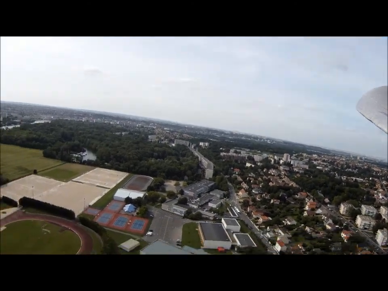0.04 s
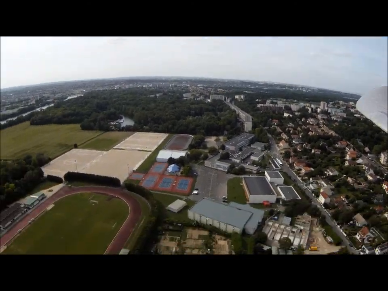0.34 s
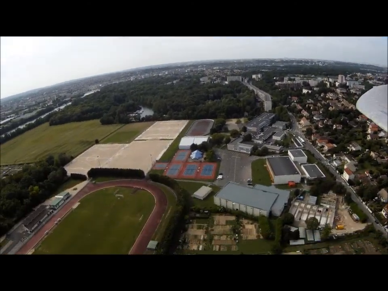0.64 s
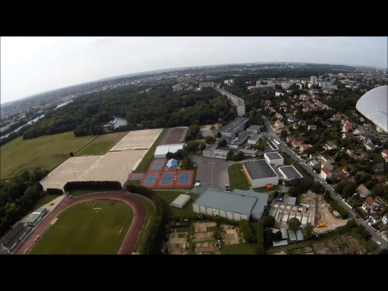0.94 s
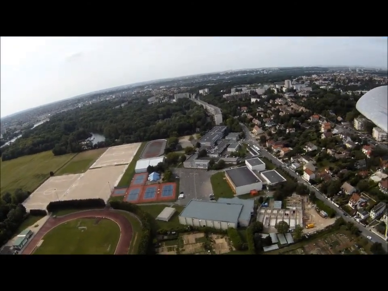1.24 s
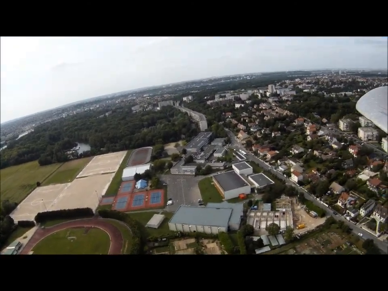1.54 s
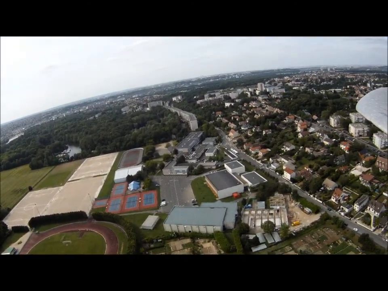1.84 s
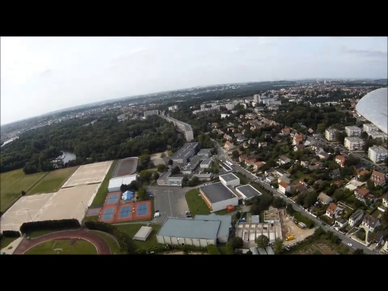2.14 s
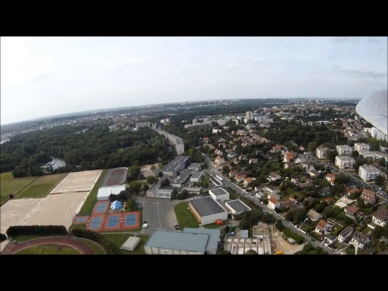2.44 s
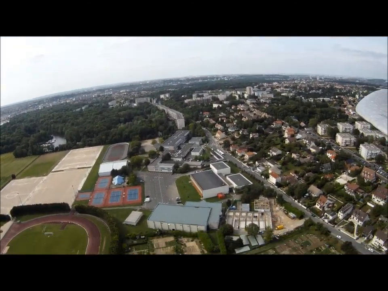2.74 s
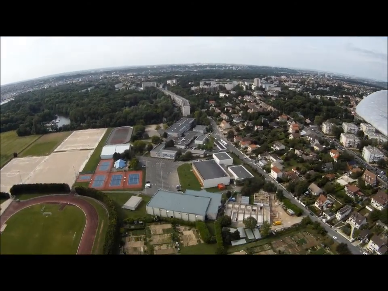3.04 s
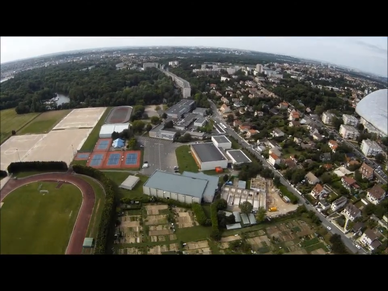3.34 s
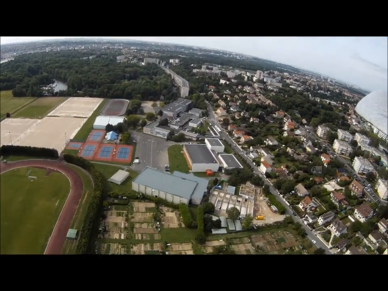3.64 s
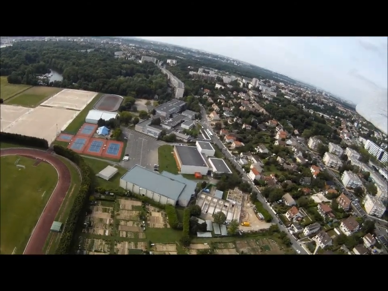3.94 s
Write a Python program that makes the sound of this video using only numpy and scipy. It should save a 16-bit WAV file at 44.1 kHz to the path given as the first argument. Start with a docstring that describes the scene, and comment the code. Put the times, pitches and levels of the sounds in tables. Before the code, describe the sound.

Wind rushes continuously over a small gliding model plane, hollow and hissing, swelling slightly in gusts. The onboard microphone also catches a low rumble and faint, irregular rattling ticks on the left.

```python
"""On board a small gliding model plane, heard from a camera as the air rushes past.
The airflow excites a hollow resonance near 750 Hz that rises with airspeed and widens in gusts,
over the broadband hiss of turbulence. Two low airframe resonances sink and fade as the flight
goes on. The left microphone also gets buffeting, a low hum, a fine crackle and the small dry
impacts of something loose."""
import sys
import numpy as np
from scipy import signal
from scipy.fft import rfft, irfft
from scipy.io import wavfile
from scipy.ndimage import uniform_filter1d

SR = 44100
rng = np.random.default_rng(int(sys.argv[2]) if len(sys.argv) > 2 else 0)


def master_out(mix):
    """Clip the mix to full scale and print it as 16-bit PCM to the path in sys.argv[1]."""
    frames = np.transpose(np.atleast_2d(mix))
    ceiling = np.clip(frames, -1, 1)
    pcm = np.round(ceiling * 32767).astype(np.int16)
    wavfile.write(sys.argv[1], SR, pcm)


N = 176400
FRAME, HOP = 1024, 256
TIME, FREQ_HZ = np.arange(N) / SR, np.fft.rfftfreq(N, 1 / SR)
FRAME_TIME, BIN_HZ = np.arange(N // HOP + 5) * HOP / SR, np.fft.rfftfreq(FRAME, 1 / SR)


def amp(db):
    """Amplitude ratio of a level in decibels."""
    return 10 ** (np.asarray(db) / 20)


def unit(x):
    """Normalisation to rms 1."""
    return x / np.sqrt(np.mean(x ** 2) + 1e-20)


def spectrum(points, hz):
    """Interpolation of a table on a logarithmic frequency axis."""
    f, value = np.transpose(points)
    return np.interp(np.log(hz + 1), np.log(f + 1), value)


def curves(rows, t):
    """Linear interpolation in time, one curve for each column after the first."""
    times, *columns = np.transpose(rows)
    return [np.interp(t, times, column) for column in columns]


def colour(x, points):
    """Zero-phase filtering by a spectrum table."""
    return irfft(rfft(x) * amp(spectrum(points, FREQ_HZ)), N)


def wander(rate_hz):
    """Random fluctuation: low-pass Gaussian noise of rms 1."""
    return unit(irfft(rfft(rng.standard_normal(N)) * np.exp(-(FREQ_HZ / rate_hz) ** 2), N))


def turbulence(shape_db, patchy_db):
    """Turbulent noise: short-lived eddies modulate a mean spectrum in time and frequency."""
    real, imag, eddies = rng.standard_normal((3, len(FRAME_TIME), len(BIN_HZ)))
    eddies = uniform_filter1d(eddies, size=8, axis=0)
    eddies = unit(uniform_filter1d(eddies, size=10, axis=1))
    frames = (real + 1j * imag) * amp(shape_db + patchy_db * eddies)
    return unit(signal.istft(frames.T, nperseg=FRAME, noverlap=FRAME - HOP)[1][:N])


def steadied(x):
    """Division by the running rms over 0.1 s evens out slow swells and leaves the fast flutter."""
    return x / np.sqrt(uniform_filter1d(x ** 2, size=SR // 10) + 1e-12)


def blown(hz, width_hz):
    """Random excitation of a resonance by airflow gives a narrow noise band about its frequency."""
    band = wander(width_hz * 0.95) + 1j * wander(width_hz * 0.83)
    phase = 2 * np.pi * np.cumsum(hz * np.ones(N)) / SR
    return steadied((band * np.exp(1j * phase)).real)


def on_left(x, right_db):
    """A level difference between the microphones places a source on the left."""
    return np.array([x, amp(right_db) * x])


# Course of the airflow: t/s, resonance f/Hz, relative resonance level/dB, relative hiss level/dB
AIRFLOW = [(0.0, 675, -45, -60.5), (0.14, 680, -46, -60), (0.22, 664, -43, -60), (0.53, 660, -44.5, -59.5),
           (1.44, 763.4, -37.5, -53.5), (1.63, 754, -40, -56.5), (1.94, 724, -40, -55.5),
           (2.05, 742, -42, -55.5), (2.19, 688, -42.5, -56), (2.38, 761, -36.5, -54),
           (2.46, 720, -40.5, -56), (2.78, 803, -37, -54.5), (2.96, 752, -39, -56), (2.97, 738, -41, -56),
           (3.42, 759, -38, -56), (3.52, 799, -40, -57), (3.76, 747, -40.5, -59), (3.96, 756, -42, -57.5)]
# Response of the hollow resonance at cruise: f/Hz, relative level/dB
HOLLOW_RESPONSE = [(300, -46.5), (480, -23.5), (570, -17), (650, -4), (730, 2.5), (800, -.5), (890, -6),
                   (1000, -14), (1150, -24.5), (1600, -52.5)]
# Bandwidth of the resonance: t/s, width factor below the centre, width factor above it
HOLLOW_WIDTH = [(0, 1.48, 1.02), (1.3, 1.32, 1.06), (2.3, 0.89, 1.05), (3.3, 0.83, 0.77), (4, 1.06, 0.86)]
# Gusts that add an upper shoulder to the resonance: t/s, 1/e half-length/s, level/dB
GUST_SWELLS = [(1.38, 0.11, -46.5), (2.72, 0.14, -61)]
def hollow_rush(cruise_hz=750):
    """Flow-excited resonance: the peak slides with airspeed, slowly narrows, and widens in gusts."""
    below, above = curves(HOLLOW_WIDTH, FRAME_TIME[:, None])
    ratio = BIN_HZ / curves(AIRFLOW, FRAME_TIME[:, None])[0]
    ratio = ratio ** (1 / np.where(ratio < 1, below, above))
    rush = steadied(turbulence(spectrum(HOLLOW_RESPONSE, cruise_hz * ratio), patchy_db=2.03))
    rush_db = curves(AIRFLOW, TIME)[1] + 0.36
    gusts = sum(amp(db) * np.exp(-((TIME - at) / half) ** 2) for at, half, db in GUST_SWELLS)
    return rush * amp(rush_db) + gusts * blown(hz=1013, width_hz=160)


# Lower airframe resonance: t/s, f/Hz, level/dB
LOWER_MODE = [(0, 165.8, -58.5), (.25, 169, -64), (.5, 163.9, -62), (.6, 166, -51), (.73, 163.3, -65),
              (.87, 160, -48.5), (.96, 160.7, -59), (1.2, 160, -57.5), (1.65, 153.3, -65.5),
              (2.48, 150, -60), (2.75, 145.5, -75), (4, 145, -73)]
# Upper airframe resonance: t/s, f/Hz, level/dB
UPPER_MODE = [(0, 355, -55.5), (.25, 342, -53), (.5, 338, -56.5), (.8, 340, -54), (1.3, 328, -58.5),
              (2, 312, -62.5), (2.6, 295, -66), (4, 285, -84)]
def airframe():
    """Forced vibration: the airflow drives two modes, about an octave apart, that sink and fade."""
    lower_hz, lower_db = curves(LOWER_MODE, TIME)
    upper_hz, upper_db = curves(UPPER_MODE, TIME)
    return amp(lower_db) * blown(lower_hz, width_hz=21.3) + amp(upper_db) * blown(upper_hz, width_hz=81)


# Spectral density of the air noise: f/Hz, relative level/dB
HISS_SPECTRUM = [(30, -19), (100, -1.5), (230, -0.5), (450, -2), (1100, 1.5), (1400, 2.5), (2100, -5),
                 (3200, -10), (4800, -15.5), (7000, -21), (9800, -24), (12500, -30), (15500, -33)]
# Correlation of the two microphones: f/Hz, shared fraction of the power
HISS_CORRELATION = [(100, 0.8), (1200, 1), (2200, 0.95), (4000, 0.73), (9000, 0.87), (15000, .15)]
def hiss():
    """Partial coherence: the air noise is nearly identical on both sides in the midrange and less alike in the
    treble."""
    shape_db = spectrum(HISS_SPECTRUM, BIN_HZ)
    share = spectrum(HISS_CORRELATION, FREQ_HZ)
    common, left, right = [rfft(turbulence(shape_db, patchy_db=0.9)) for _ in range(3)]
    pair = irfft(np.sqrt(share) * common + np.sqrt(1 - share) * np.array([left, right]), N)
    hiss_db = curves(AIRFLOW, TIME)[2] + 3.5
    flicker_db = 0.5 * wander(rate_hz=21)
    return pair * amp(hiss_db + flicker_db)


# Strength of the buffeting on the left: t/s, level/dB
BUFFET_ENVELOPE = [(0, -61.5), (.7, -60.5), (1.3, -58), (2.1, -56), (2.7, -58.5), (3.1, -58), (3.32, -55.5),
                   (3.6, -55.5), (4, -57.5)]
# Spectral density of the buffeting: f/Hz, relative level/dB
BUFFET_SPECTRUM = [(20, -30), (38, -23), (60, -0.5), (88, 15), (140, 9), (210, -5), (400, 1), (900, -30)]
def buffeting(right_db=-23):
    """Local turbulent pressure: a rumble independent at each microphone, far stronger on the left."""
    left, right = [unit(colour(rng.standard_normal(N), BUFFET_SPECTRUM)) for _ in range(2)]
    return np.array([left, amp(right_db) * right]) * amp(curves(BUFFET_ENVELOPE, TIME)[0])


def hum(mean_hz=52.2, drift_hz=0.72, mean_db=-60.5, waver_db=1.2):
    """Nearly simple harmonic vibration: a low, wavering tone that grows with the airflow."""
    hz = mean_hz + drift_hz * wander(rate_hz=2.9)
    tone = unit(np.sin(2 * np.pi * np.cumsum(hz) / SR))
    flow_db = curves(AIRFLOW, TIME)[2]
    level_db = mean_db + 0.7 * (flow_db - flow_db.mean()) + waver_db * wander(rate_hz=6)
    return on_left(tone * amp(level_db), right_db=-13)


def clicks(per_s, points, spread_db=6.5):
    """Shot noise: filtered impulses of uneven size arrive at random, scaled to rms 1."""
    sizes = amp(spread_db * np.minimum(rng.exponential(1, N), 3))
    signs = rng.choice([-1., 1.], N)
    arrivals = rng.random(N) < per_s / SR
    return unit(colour(sizes * signs * arrivals, points))


# Spectrum of the fine crackle: f/Hz, relative level/dB
CRACKLE_SPECTRUM = [(500, -10), (2000, 5.5), (4500, 6), (7000, -2), (10000, -2.5), (13000, -21),
                    (15500, -17)]
# Spectrum of the sparse, very bright clicks: f/Hz, relative level/dB
SPECK_SPECTRUM = [(1000, -16), (7000, -10), (11000, -5), (15000, -5)]
def crackle(fine_per_s=180, specks_per_s=28, flurry_at_s=3.31, flurry_half_s=0.09):
    """Two Poisson processes: tiny clicks with one denser flurry, and sparser bright specks."""
    flurry_db = 8.5 * np.exp(-((TIME - flurry_at_s) / flurry_half_s) ** 2)
    fine = amp(-67) * clicks(fine_per_s * amp(flurry_db) ** 2, CRACKLE_SPECTRUM)  # power goes as rate
    specks = amp(-74) * clicks(specks_per_s, SPECK_SPECTRUM)
    return on_left(fine + specks, right_db=-35)


# Knocks of the loose part: t/s, relative peak level/dB
IMPACTS = [(0.16, -49.5), (0.4092, -49), (0.5694, -41), (0.77, -48), (0.9512, -51), (1.052, -48),
           (1.0742, -45), (1.1662, -43), (1.255, -48), (1.5014, -48), (1.6879, -48), (1.9994, -47),
           (2.1146, -47), (2.2347, -43.5), (2.4832, -45), (2.6165, -45), (2.6425, -41), (2.7598, -50),
           (2.8452, -48), (3.026, -47), (3.1482, -40.5), (3.24, -41.5), (3.3024, -50), (3.3244, -60),
           (3.334, -40), (3.346, -49), (3.5573, -50), (3.7025, -45.5)]
# Spectrum of a knock: f/Hz, relative level/dB
IMPACT_SPECTRUM = [(500, -12), (1300, 9), (2500, 6), (5000, 4.5), (7000, -5), (9000, -5.5), (11500, -7),
                   (13500, -7), (15500, -6)]
def ticks(delay_s=0.00132, rise_s=0.00045, decay_s=0.00041, tail_s=0.004, tail_db=-15):
    """Impact transients: something loose knocks, each a noise burst with a faint exponential tail."""
    envelope = np.zeros(N)
    for at, db in IMPACTS:
        t = TIME - at - delay_s
        snap = np.exp(-abs(t) / np.where(t < 0, rise_s, decay_s))
        tail = (t > 0) * amp(tail_db) * np.exp(-abs(t) / tail_s)
        envelope += amp(db) * (snap + tail)
    bursts = envelope * rng.choice([-1., 1.], N)
    return on_left(1.5 * colour(bursts, IMPACT_SPECTRUM), right_db=-35)


def scene():
    """Superposition: airflow in the centre; buffeting, hum and rattles on the left."""
    return hollow_rush() + airframe() + hiss() + buffeting() + hum() + ticks() + crackle()


def record(dry):
    """Low-pass filtering: the microphones' treble roll-off, then the camera's band limit."""
    corner_hz, order, edge_hz = 13600, 4, 15650
    soft = irfft(rfft(dry) / np.sqrt(1 + (FREQ_HZ / corner_hz) ** (2 * order)), N)
    band_limit = signal.firwin(511, edge_hz, window=("kaiser", 9), fs=SR)
    return signal.oaconvolve(soft, band_limit[None], "same")


dry = scene()
out = record(dry)
master_out(out)
```